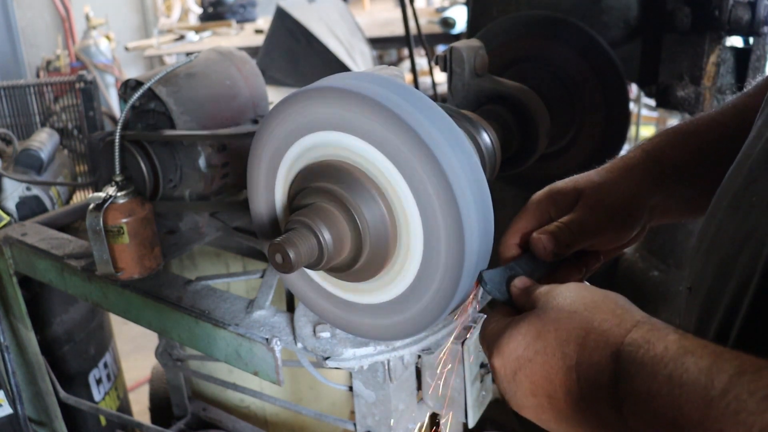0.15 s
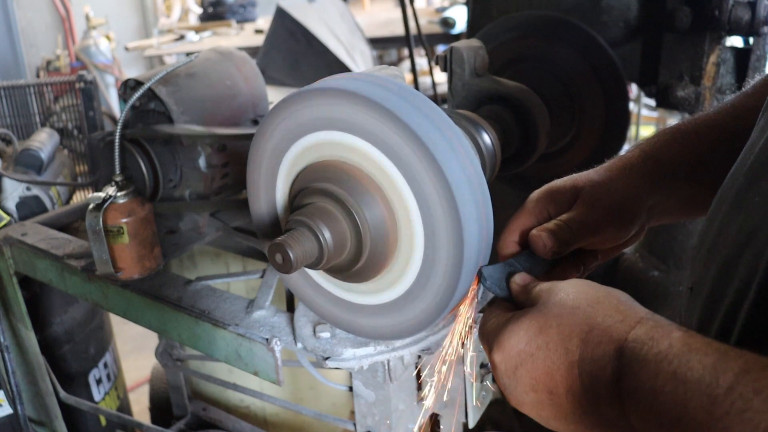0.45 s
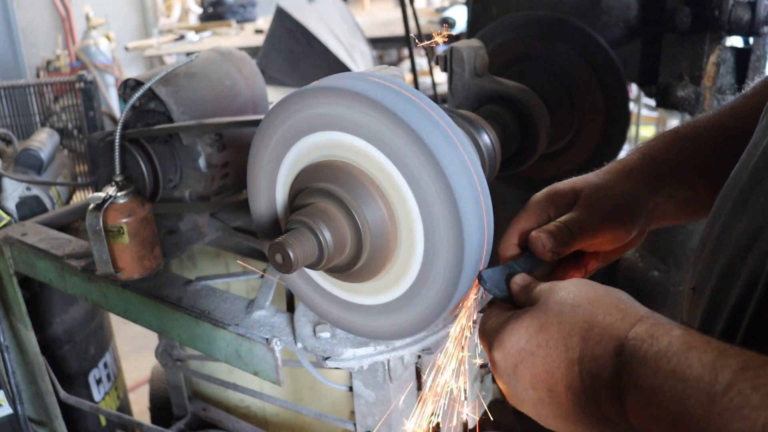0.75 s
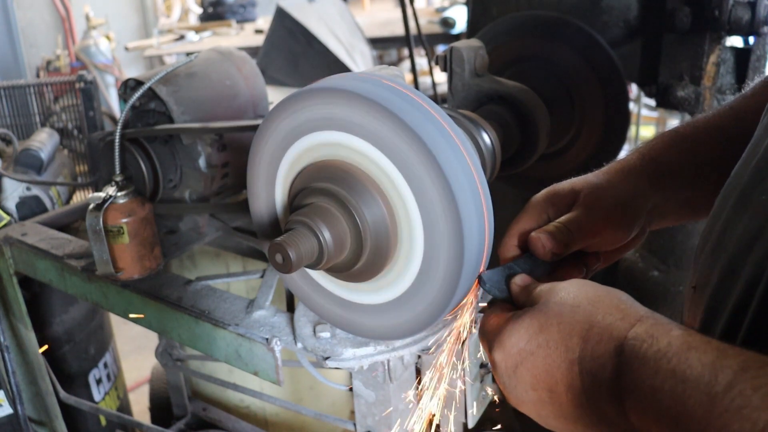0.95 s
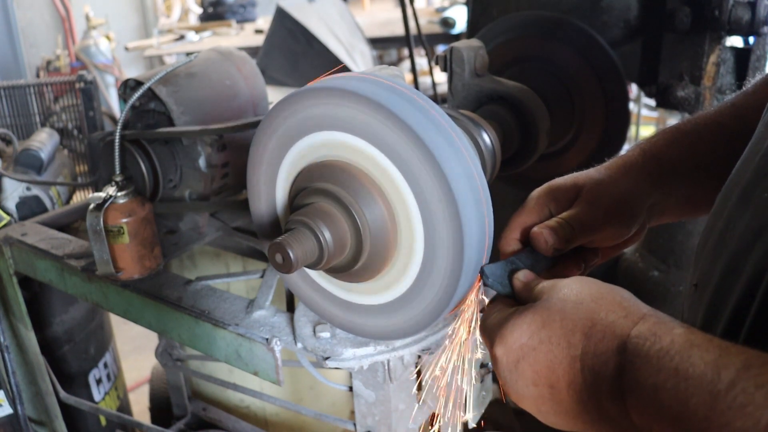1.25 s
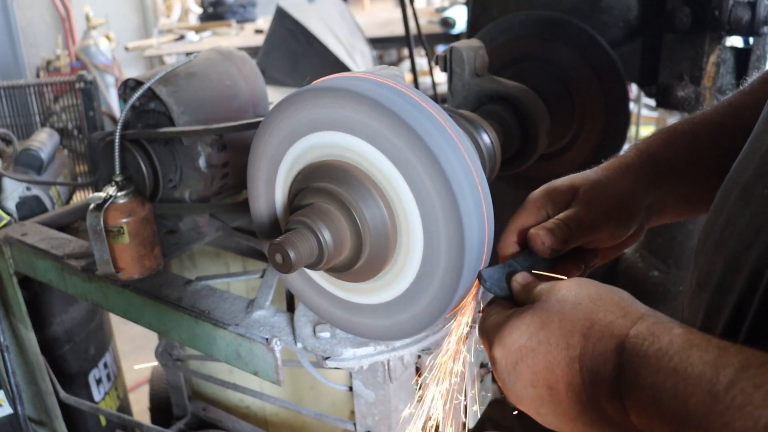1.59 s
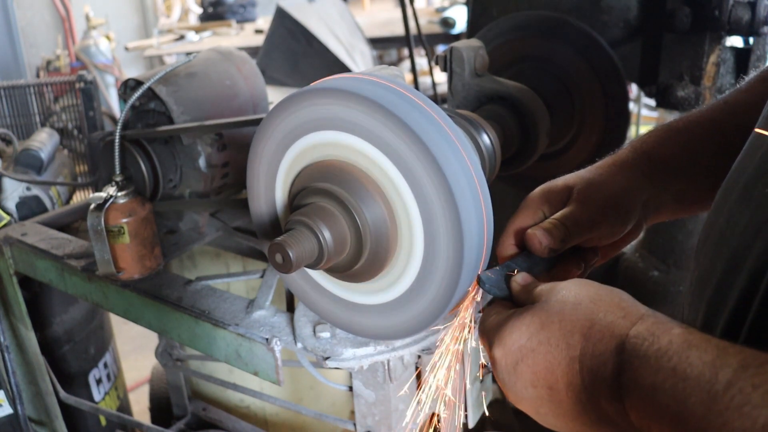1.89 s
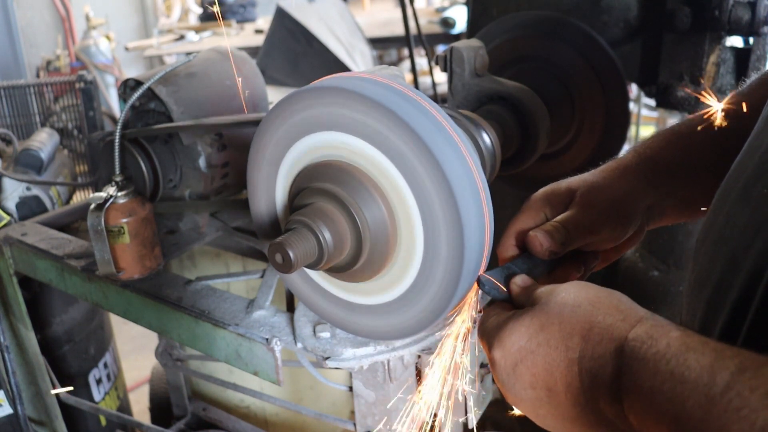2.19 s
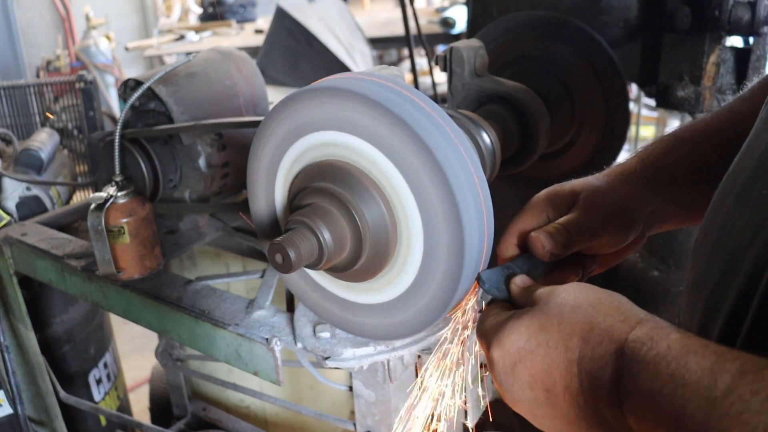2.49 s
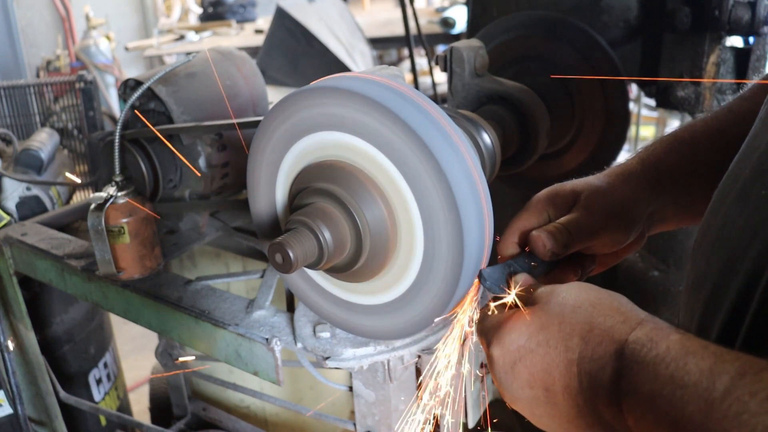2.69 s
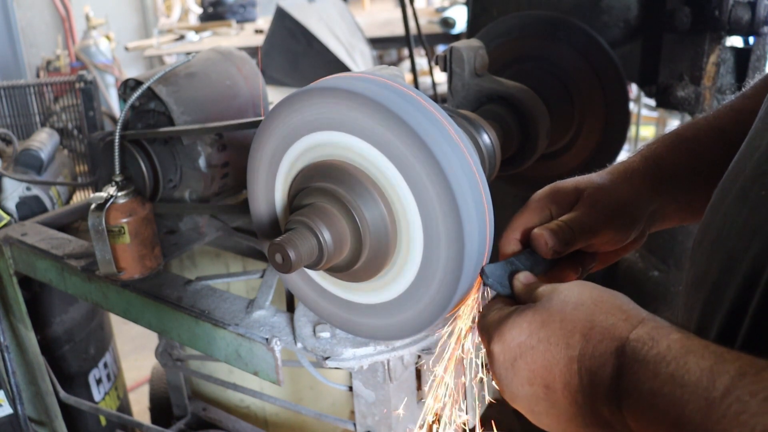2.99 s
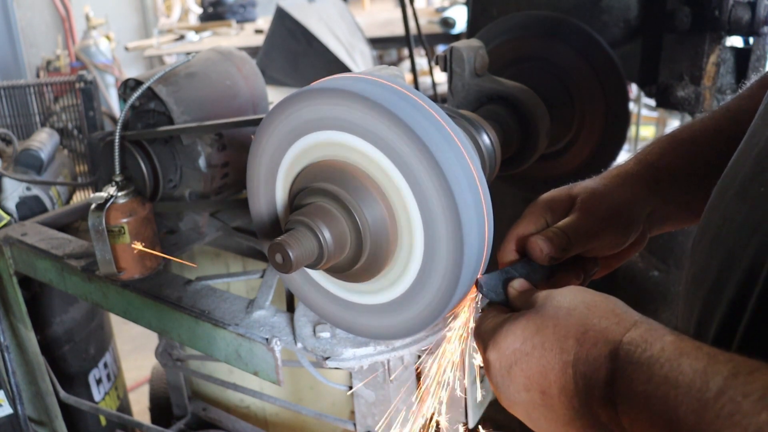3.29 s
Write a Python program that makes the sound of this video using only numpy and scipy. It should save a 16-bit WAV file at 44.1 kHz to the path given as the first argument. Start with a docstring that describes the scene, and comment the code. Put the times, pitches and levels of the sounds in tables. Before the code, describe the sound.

A bench grinder's stone wheel grinds hand-held steel with a continuous, harsh, high ringing rasp. Sharp knocks come thickly at first, then more sparsely, over a low rumble and faint hum, heard close in a workshop with a short echo.

```python
"""A harsh, ringing rasp: a hand-held piece of steel is pressed on the stone wheel of a bench grinder.
Grit hits the steel in a stream of tiny ticks, harder once per turn because the wheel is not quite round.
The steel rings high, while wheel and bench ring low over the hum of the drive.
Sharp knocks break in where the steel catches, and the workshop adds a short echo."""
import sys
import numpy as np
from scipy import signal
from scipy.io import wavfile
from scipy.ndimage import uniform_filter1d

SR = 44100
rng = np.random.default_rng(int(sys.argv[2]) if len(sys.argv) > 2 else 0)


def unload_wav(signal):
    """Save mono or channel-first audio to the path in sys.argv[1] as 16-bit WAV at rate SR, clipped to [-1, 1]."""
    wavfile.write(
        sys.argv[1],
        SR,
        np.round(np.clip(np.atleast_2d(signal).T, -1, 1) * 32767).astype(np.int16),
    )


N = 152145
T = np.arange(N) / SR


def amp(db):
    return 10 ** (np.asarray(db) / 20)


def unit_level(x):
    return x / np.sqrt(np.mean(x ** 2) + 1e-20)


def curve(table, column=1):
    rows = np.array(table)
    return np.interp(T, rows[:, 0], rows[:, column])


def colour(x, spectrum):
    """Make each pitch louder or softer, as a table of (f/Hz, level/dB) says."""
    f, db = np.transpose(spectrum)
    hz = np.abs(np.fft.fftfreq(4096, 1 / SR))
    log_gain = np.log(amp(np.interp(np.log(hz + 1), np.log(f + 1), db)))
    response = np.exp(np.conj(signal.hilbert(log_gain)))  # nothing sounds before its cause
    return signal.oaconvolve(x, np.fft.ifft(response).real[:2048])[:N]


def mode(x, hz, width, db):
    """One tone a struck object rings at. It starts softly; the wider it is, the sooner it fades."""
    decay = np.exp(-np.pi * width / SR)
    pole = decay * np.exp(2j * np.pi * hz / SR)
    return 2 * amp(db) * signal.lfilter([(1 - decay) ** 2], [1, -2 * pole, pole ** 2], x).real


def ring(ticks, modes, spread=0.93):
    """Each tick lands on a new spot, so it stirs each tone by a different amount."""
    return sum(mode(ticks * (1 + spread * rng.standard_normal(N)), *row) for row in modes)


def grit(ticks_per_s=1800, spread_db=3.5, clump_db=0.47):
    """Grains of stone hit the steel: dense ticks of uneven size that come in clumps."""
    smoothing = np.exp(-2 * np.pi * 25 / SR)  # clumps vary mostly below 25 Hz
    clumps = unit_level(signal.lfilter([1], [1, -smoothing], rng.standard_normal(N)))
    size = amp(spread_db * np.minimum(rng.exponential(1, N), 3.4) + clump_db * clumps)
    return unit_level(size * (rng.random(N) < ticks_per_s / SR))


# How the wheel spins: t/s, turning rate/Hz, throb depth/dB
WHEEL_SPIN = [(0, 33.8, 6.5), (.35, 31.6, 1.5), (.62, 37.3, 1.5), (1.0, 34.6, 7), (1.2, 44, -1.5),
              (1.4, 38.8, 5.5), (1.8, 37.2, 1), (2.2, 35, 2), (2.7, 37.8, 2), (3.45, 37, 2.5)]


def throb_db(high_spot_s=0.731):
    """The wheel's high spot presses harder on the steel once per turn."""
    turns = np.cumsum(curve(WHEEL_SPIN)) / SR
    turns -= np.interp(high_spot_s, T, turns)
    return curve(WHEEL_SPIN, column=2) * np.cos(2 * np.pi * turns)


# How loud the grinding is: t/s, steel level/dB, wheel and bench level/dB
GRIND_LEVELS = [(0, -22.5, -24.5), (.15, -21.5, -23.5), (.3, -23, -24), (.45, -18, -25.5), (.65, -23, -25),
                (.8, -22.5, -26.5), (1.0, -24, -25.5), (1.15, -22, -29), (1.35, -20.5, -26.5),
                (1.55, -22.5, -26.5), (1.8, -20, -25), (2.0, -19.5, -27), (2.2, -21, -25),
                (2.4, -20, -22.5), (2.6, -23, -24), (2.85, -20, -24), (3.1, -19, -23), (3.45, -19.5, -24.5)]
# The tones the steel rings at: f/Hz
STEEL_PITCHES = [5080, 5225, 5950, 6160, 7400, 8780, 8925, 9080, 9230, 9490, 9745, 11555, 11655, 11800,
                 14695, 14920, 15080]
# The shape of each of those tones: width/Hz, level/dB
STEEL_SHAPES = [(90, -5), (114, -8.5), (434, -13), (100, -9), (37, -19), (460, -40), (91, -4), (238, -2.5),
                (154, 1.16), (290, -30), (30, -6.5), (120, -20.5), (160, -20), (620, -31), (35, -22),
                (270, -21.5), (300, -32)]
# The ticking hiss, with the highest treble cut away above about 15 kHz: f/Hz, level/dB
HISS_SPECTRUM = [(40, -69), (300, -36), (1500, -17.5), (3000, -17), (4600, -18), (7000, -23), (7800, -28),
                 (8500, -23), (10500, -30.5), (12300, -34), (13800, -36), (14400, -34), (15500, -49),
                 (15900, -62), (16500, -76.5)]
# How far that hiss is turned up beside the ringing: t/s, level/dB
HISS_GAIN = [(0, -1), (.8, -1.5), (1.3, 0.5), (1.8, 0), (2.3, 2.6), (2.8, 1.6), (3.45, -0.7)]
HIGH_FROM_HZ, TOP_FROM_HZ = 7000, 10500


def steel(ticks):
    """The ticks make the steel ring high, over their own hiss."""
    throbbing = unit_level(ticks * amp(throb_db()))
    steady = grit()  # a second patch of grit that does not throb
    modes = [(hz, *shape) for hz, shape in zip(STEEL_PITCHES, STEEL_SHAPES)]
    bands = (0, HIGH_FROM_HZ, 0.41), (HIGH_FROM_HZ, TOP_FROM_HZ, 0), (TOP_FROM_HZ, SR, 0.5)
    ringing = 0
    for low_hz, high_hz, steady_share in bands:
        hits = np.sqrt(1 - steady_share ** 2) * throbbing + steady_share * steady
        ringing += ring(hits, [row for row in modes if low_hz < row[0] < high_hz])
    hiss = amp(curve(HISS_GAIN)) * colour(throbbing, HISS_SPECTRUM)
    return amp(curve(GRIND_LEVELS)) * unit_level(ringing + hiss)


# The tones wheel and bench ring at: f/Hz, width/Hz, level/dB
BENCH_MODES = [(257.3, 45, -16.5), (472, 73, -11), (621, 47, -8), (842, 390, -17.5), (1058.6, 110, -7.5),
               (1136, 117, -4.5), (1197.6, 34, -4), (1441, 500, -17), (2376, 173, -13), (2542, 44, -11),
               (2770, 410, -20), (3668, 220, -16.5), (3963, 230, -18)]
# The sound of their rumble: f/Hz, level/dB
RUMBLE_SPECTRUM = [(25, -44), (50, -42), (100, -34), (200, -19), (400, -18.5), (800, -16.5), (1600, -22),
                   (3000, -25.5), (6000, -34), (16000, -87)]
# The rumble is fuller at first, while the steel is pressed hard: t/s, level/dB
RUMBLE_LOUDNESS = [(0, -25), (.3, -25), (.5, -26), (.58, -31), (.65, -24), (.74, -35.5), (1.1, -31),
                   (1.5, -32), (2.0, -32.5), (2.5, -33), (3.0, -31.5), (3.45, -33)]


def bench(ticks, grit_share=0.57, throb_share=0.71):
    """Wheel and bench ring low and rumble, shaken by the grit and by the running drive."""
    drive = np.sqrt(1 - grit_share ** 2) * rng.standard_normal(N)
    shake = (grit_share * ticks + drive) * amp(throb_share * throb_db())
    rumble = unit_level(colour(rng.standard_normal(N), RUMBLE_SPECTRUM))
    ringing = unit_level(ring(shake, BENCH_MODES))
    return amp(curve(GRIND_LEVELS, column=2)) * ringing + amp(curve(RUMBLE_LOUDNESS)) * rumble


# The low tones of the drive: f/Hz, level/dB
DRIVE_TONES = [(37.7, -68.5), (75.4, -54.5), (118.4, -52)]


def hum(waver_db=3.6):
    """The drive hums, each tone wavering a little in loudness."""
    wavers = unit_level(uniform_filter1d(rng.standard_normal((len(DRIVE_TONES), N)), 6000))
    return sum(np.sqrt(2) * amp(db + waver_db * waver) * np.sin(2 * np.pi * (hz * T + rng.random()))
               for (hz, db), waver in zip(DRIVE_TONES, wavers))


def knock_sounds(widening=1.4, top_db=-9, bench_db=-5, rise_s=0.00017):
    """One blow gives a high ring of the steel and a duller crack through steel, wheel and bench."""
    blow = signal.unit_impulse(4096)
    # A hard blow presses the steel into the stone, so its tones widen and fade sooner.
    tones = {hz: mode(blow, hz, widening * width, db + top_db * (hz > TOP_FROM_HZ))
             for hz, (width, db) in zip(STEEL_PITCHES, STEEL_SHAPES)}
    high = sum(tones[hz] for hz in tones if hz > HIGH_FROM_HZ)
    crack = sum(tones.values()) - high + colour(blow, HISS_SPECTRUM)[:len(blow)]
    crack += amp(bench_db) * sum(mode(blow, *row) for row in BENCH_MODES)
    high *= 1 - np.exp(-T[:len(blow)] / rise_s)
    return high / abs(high).max(), crack / abs(crack).max()


# Each time the steel catches: t/s, high ring level/dB, dull crack level/dB
CATCHES = [(0.0253, -8, -9), (0.0647, -1, -3), (0.0987, -12, -25), (0.1062, -4, -17), (0.1535, -6.5, -16),
           (0.1905, -2.5, -14), (0.2174, -14, -2), (0.2344, -8, -6), (0.2534, -12, -24), (0.2584, -14, 3),
           (0.2654, -6, -4), (0.2897, -8, -10), (0.2944, -1.5, -24), (0.3247, -8, -24),
           (0.3526, -7.5, -5.5), (0.4209, -6.5, -12), (0.4753, -19, -18), (0.5157, -8, -6),
           (0.5432, -3.5, -5), (0.6245, -4, -1), (0.6509, -15, 0), (0.6729, -8, -6), (0.7262, -1, -1.5),
           (0.7324, -7, -6), (0.7532, -4, -3), (0.8056, -4.5, -6.5), (0.8385, -16, -5), (0.8849, -6, -5),
           (0.9373, -6, -6), (0.9454, -11, -2.5), (0.9687, -15, -13), (0.9914, -17, -11), (0.9974, -23, -1),
           (1.2914, -9, -12), (1.4086, -8, -17), (1.4381, -8, -3.5), (1.4906, -8, -15), (1.5424, -8.5, -14),
           (1.5924, -10, -5), (1.6222, -6.5, -24), (1.701, -9, -6), (1.8455, -11, -12), (1.9165, -7, -0.5),
           (2.4853, -10, -7), (2.6748, -10, -6), (2.7586, -23, -5.5), (2.9361, -5, -2.5), (3.1017, -5, -25),
           (3.1348, -9, -1), (3.2321, -16, -5), (3.2924, -9, -5), (3.3373, -4, -10)]


def knocks(cracks_per_s=90, crack_db=-22.5, spread_db=2.5, scrape_s=0.0017):
    """The steel catches with hard knocks; small cracks fall at random, louder on the high spot."""
    size = amp(crack_db + spread_db * np.minimum(rng.exponential(1, N), 3) + throb_db())
    crack_hits = size * (rng.random(N) < cracks_per_s / SR) * rng.choice([-1, 1], N)
    high_hits = np.zeros(N)
    for t, high_db, dull_db in CATCHES:
        at = round(t * SR)
        high_hits[at], crack_hits[at] = amp([high_db, dull_db])
    # Every crack trails a short scrape.
    scrape = signal.lfilter([0, 0.05], [1, -np.exp(-1 / SR / scrape_s)], abs(crack_hits))
    crack_hits += scrape * rng.standard_normal(N)
    high, crack = knock_sounds()
    return (signal.oaconvolve(high_hits, high) + signal.oaconvolve(crack_hits, crack))[:N]


def workshop(x, level_db=-13, rise_s=0.012, fade_s=0.28):
    """The room sends back many small echoes that build up and die away."""
    delays = np.arange(100, SR // 2, 22)
    delays += rng.integers(0, 22, len(delays))
    t = delays / SR
    echoes = np.zeros(SR)
    echoes[delays] = rng.choice([-1., 1.], len(t)) * amp(-60 * t / fade_s) * np.minimum(t / rise_s, 1)
    return amp(level_db) * signal.fftconvolve(x, echoes / np.linalg.norm(echoes))[:N]


def scene():
    """The same grit shakes steel and bench; knocks, echo and hum join them."""
    ticks = grit()
    grinding = steel(ticks) + bench(ticks) + knocks()
    return (grinding + workshop(grinding) + hum())[None]


def record(dry, lowest_hz=28, highest_hz=16500):
    """The deepest bass is dropped, peaks clip at full scale, and treble above 16.5 kHz is cut."""
    bass_cut = signal.butter(3, lowest_hz, "high", fs=SR, output="sos")
    treble_cut = signal.firwin(511, highest_hz, window=("kaiser", 9), fs=SR)
    clipped = np.clip(signal.sosfilt(bass_cut, dry), -1, 1)
    return signal.oaconvolve(clipped, treble_cut[None], "same")


dry = scene()
out = record(dry)
unload_wav(out)
```